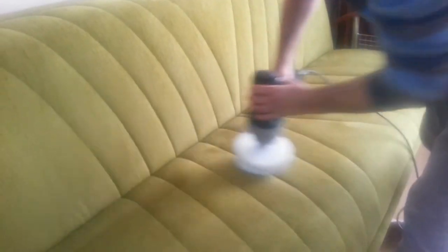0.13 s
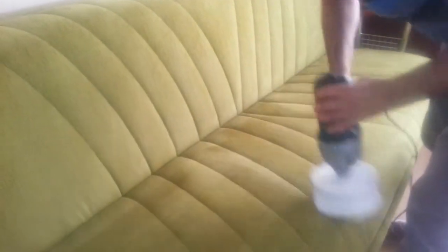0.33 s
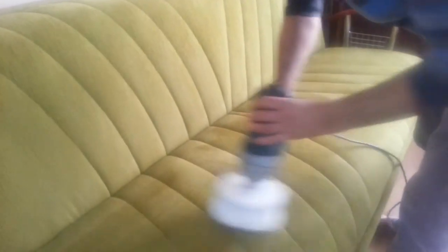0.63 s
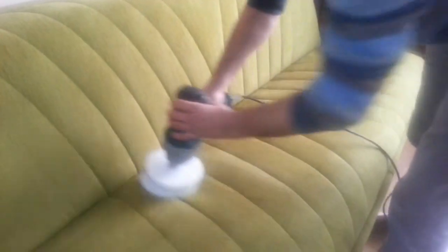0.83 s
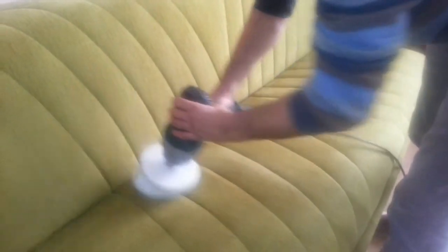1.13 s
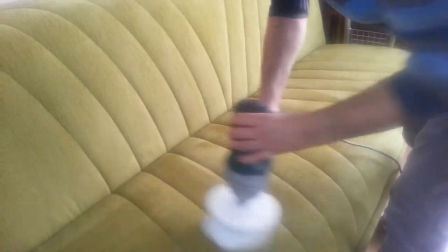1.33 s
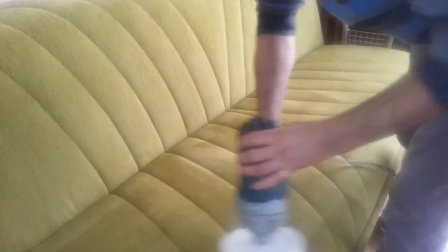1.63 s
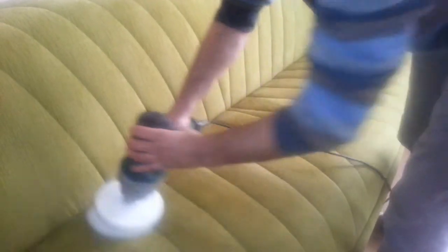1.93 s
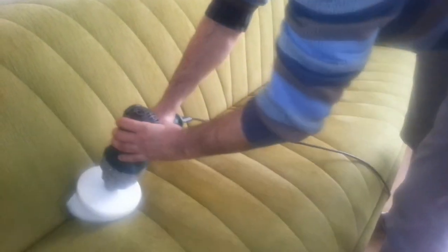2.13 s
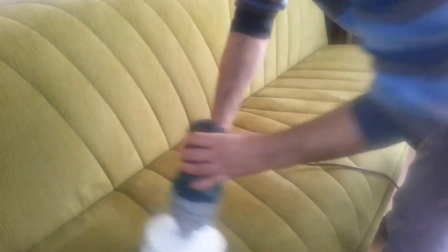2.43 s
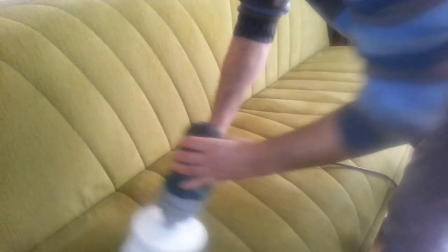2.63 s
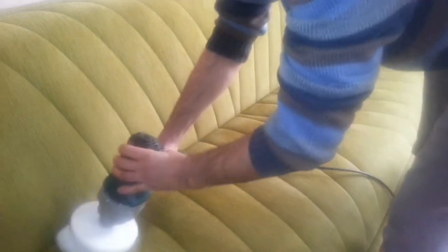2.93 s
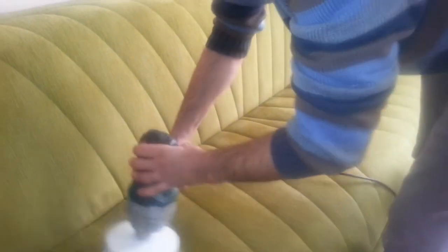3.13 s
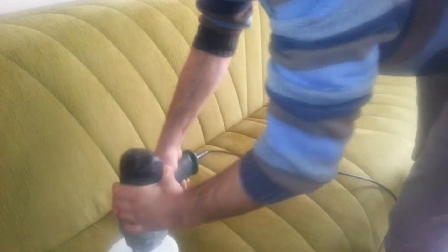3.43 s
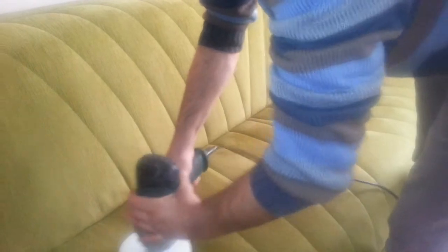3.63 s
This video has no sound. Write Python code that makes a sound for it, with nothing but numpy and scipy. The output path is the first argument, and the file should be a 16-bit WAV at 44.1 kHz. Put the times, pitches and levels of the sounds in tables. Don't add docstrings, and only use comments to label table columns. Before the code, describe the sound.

A handheld rotary brush runs continuously on a fabric sofa indoors, its shrill whine flickering between left and right over roaring, hissing noise; soft low thuds follow, and the pitch sags late. Close stereo microphone.

```python
import sys
import numpy as np
from scipy import signal
from scipy.io import wavfile
from scipy.ndimage import uniform_filter1d

SR = 44100
rng = np.random.default_rng(int(sys.argv[2]) if len(sys.argv) > 2 else 0)


def nominal_scale(level):
    x = np.asarray(level, float) / 20
    return 10 ** x


def digitize_waveform(pressure):
    field = np.atleast_2d(pressure).T
    bounded = np.clip(field, -1, 1)
    quanta = np.round(bounded * 32767).astype(np.int16)
    wavfile.write(sys.argv[1], SR, quanta)


N = 166257


def rms_one(x):
    return x / np.sqrt(np.mean(x ** 2) + 1e-20)


def in_time(rows):
    s, *columns = np.transpose(rows)
    now_s = np.arange(N) / SR
    return np.array([np.interp(now_s, s, c) for c in columns])


def at_hz(rows, hz):
    f, *columns = np.transpose(rows)
    fall_db = 12 * np.log2(max(hz / f[-1], 1))
    return np.array([[np.interp(np.log(hz), np.log(f), c, right=c[-1] - fall_db)] for c in columns])


def drift(rate_hz):
    r = np.exp(-80 * np.pi * rate_hz / SR)
    white = rng.standard_normal(N // 40 + 3002)
    slow = signal.lfilter([1], [1, -2 * r, r * r], white)[3000:]
    return np.interp(np.arange(N) / 40, np.arange(len(slow)), rms_one(slow - slow.mean()))


# t/s, f/Hz (turns per second)
SHAFT_SPEED = [(0.0, 412.7), (0.125, 412.7), (0.274, 411), (0.454, 415.9), (0.63, 417.1), (0.773, 419.6),
               (0.85, 419), (0.923, 415.7), (1.122, 410.4), (1.257, 412.6), (1.482, 410.5), (1.611, 413.3),
               (1.771, 414.6), (1.851, 417), (1.951, 417), (2.17, 408.8), (2.23, 407.4), (2.609, 410.6),
               (2.739, 409.4), (2.824, 407.3), (3.043, 399), (3.243, 397.5), (3.467, 389.6), (3.77, 385)]


def shaft():
    wobble_hz = 0.35
    speed_hz = uniform_filter1d(in_time(SHAFT_SPEED)[0], size=2000)
    turns = np.cumsum(speed_hz + wobble_hz * drift(24.3)) / SR
    return speed_hz, turns


def order_tone(turns, order, flutter_db=3.0):
    lead = np.c_[[0, (order > 3) / 4]]
    sine = np.sin(2 * np.pi * (order * turns + rng.random() + lead))
    return nominal_scale(flutter_db * drift(12.0)) * np.sqrt(2) * sine


def order_family(turns, rows):
    return sum(nominal_scale(np.c_[[left_db, right_db]]) * order_tone(turns, order) for order, left_db, right_db in rows)


# t/s, left level/dB, right level/dB
WHINE_FADES = [(0.0, -31, -21), (0.04, -27, -24), (0.12, -26.0, -18.5), (0.2, -21, -23.5),
               (0.234, -21, -19.0), (0.374, -17, -21), (0.499, -16.5, -21), (0.584, -19.5, -19),
               (0.758, -11, -16), (0.808, -16, -17), (0.858, -20, -23), (0.953, -13, -17), (0.998, -19, -17),
               (1.073, -11.5, -23), (1.102, -14.0, -30), (1.177, -13, -13.5), (1.262, -16.5, -29),
               (1.302, -19.5, -12.5), (1.347, -13, -20), (1.407, -10, -17), (1.472, -13, -20.5),
               (1.502, -18.0, -24), (1.541, -16, -21), (1.591, -25, -22), (1.636, -24.5, -30.5),
               (1.701, -31, -27), (1.751, -20.5, -19), (1.826, -14, -22), (1.876, -12, -18),
               (2.005, -15.5, -27.0), (2.065, -13, -28), (2.11, -21, -20), (2.205, -15, -23),
               (2.27, -26, -23), (2.305, -12.5, -29), (2.345, -14.0, -26), (2.385, -11.5, -39),
               (2.429, -12, -20), (2.539, -17, -14.5), (2.599, -17.0, -19), (2.744, -18.5, -19),
               (2.824, -12.5, -30.0), (2.913, -18.5, -25.0), (2.953, -17, -34.0), (3.028, -32, -22),
               (3.078, -19.5, -33), (3.163, -23.0, -29.5), (3.203, -14.5, -37), (3.258, -15.5, -23.0),
               (3.307, -25, -35), (3.377, -16, -25), (3.537, -13.5, -18), (3.602, -12.5, -29.0),
               (3.642, -18, -28), (3.687, -34, -22), (3.77, -25, -22.5)]


def motor_whine(turns):
    return nominal_scale(in_time(WHINE_FADES)) * order_tone(turns, 12, flutter_db=0)


# t/s, shaft hum level/dB, seven-blade fan level/dB, fan octave level/dB
HOUSING_GRIP = [(0, -34.5, -30, -52), (.25, -35, -25, -50), (.45, -47.5, -43, -44.5),
                (1.0, -38.5, -34.5, -36), (1.3, -47.5, -30, -45), (2.0, -42.5, -34, -28),
                (2.3, -44, -42, -41), (2.6, -54, -30.5, -33), (2.75, -40.5, -30, -48),
                (2.9, -36, -30.5, -40), (3.15, -38, -23.5, -39), (3.24, -36.5, -27.5, -14.5),
                (3.45, -36, -32, -18.5), (3.77, -33, -26.5, -34)]
# multiple of shaft speed, left level/dB, right level/dB
HUM_ORDERS = [(.89, -9.5, -10), (1, 2.5, -1.5), (2, -8, -12), (5.52, 1, -5)]


def fan_and_housing(turns):
    hum_db, fan_db, octave_db = in_time(HOUSING_GRIP)
    fan = nominal_scale(fan_db - 3.0) * order_tone(turns, 7)
    octave = nominal_scale(octave_db + np.c_[[-8.0, -14.0]]) * order_tone(turns, 14)
    return fan, octave + nominal_scale(hum_db) * order_family(turns, HUM_ORDERS)


# multiple of shaft speed, left level/dB, right level/dB
GEAR_ORDERS = [(35, -44, -45), (36, -48, -48)]


def loaded_gears(turns, speed_hz):
    loaded_hz, wake_db_per_hz = 395, 1.2
    load = nominal_scale(-wake_db_per_hz * np.maximum(speed_hz - loaded_hz, 0))
    return load * order_family(turns, GEAR_ORDERS)


# multiple of shaft speed, left level/dB, right level/dB
FAINT_ORDERS = [(2.76, -40.5, -40), (3, -45, -49), (8, -40, -44), (10, -49, -46), (11, -48, -48),
                (13, -47, -45), (21, -50, -47), (23, -47, -43), (24, -41, -34.5), (28, -58, -54)]


def motor():
    speed_hz, turns = shaft()
    fan, housing = fan_and_housing(turns)
    airborne = motor_whine(turns) + fan + order_family(turns, FAINT_ORDERS)
    return airborne, housing + loaded_gears(turns, speed_hz)


# t/s, speed/(m/s)
HAND_SPEED = [(0, 1.3), (.4, 1.5), (.55, 1.0), (.7, 1.9), (.9, 2.2), (1.02, 1.0), (1.25, 1.4), (1.5, .8),
              (1.78, 2.0), (1.95, 1.1), (2.2, 1.0), (2.35, 1.7), (2.55, .9), (2.85, 1.6), (3.1, 1.6),
              (3.4, .3), (3.62, .3), (3.68, 1.8), (3.77, 1.8)]


def moving_echoes(x, count):
    echo_db, near_s, far_s = -16.0, .004, .03
    seat_db, full_sweep_m_per_s = -5.0, 2.0
    strokes_per_s, sound_m_per_s = .9, 343
    out, now = x.copy(), np.arange(N)
    speed = in_time(HAND_SPEED)[0]
    seat = nominal_scale(seat_db) * np.minimum(speed / full_sweep_m_per_s, 1) ** 2

    def reflect(side, lag_s, path_m):
        return np.interp(np.abs(now - (lag_s + path_m / sound_m_per_s) * SR), now, x[side])

    for side in range(2):
        for lag_s in np.geomspace(near_s, far_s, count) * rng.uniform(.85, 1.15, count):
            stroke = np.tanh(4 * np.cos(2 * np.pi * (strokes_per_s * now / SR + rng.random())))
            path_m = np.cumsum(speed * rng.uniform(.7, 1.2) * stroke) / SR
            out[side] += nominal_scale(echo_db) * reflect(side, lag_s, path_m)
        path_m = np.cumsum(speed * (1 + .4 * drift(6.0))) / SR
        out[side] += seat * reflect(side, near_s, path_m)
    return out / np.sqrt(1 + seat ** 2 + count * nominal_scale(2 * echo_db))


# t/s, pressure level/dB, left-right level/dB, brightness level/dB
PAD_PRESSURE = [(0.0, -27, 3, 3), (0.03, -23.5, 6.0, 0.5), (0.11, -26, 5.5, 3.5), (0.16, -24, 6.5, 4.5),
                (0.31, -25.5, 5.5, 2), (0.57, -23.5, 7, 2.5), (1.09, -26.5, 4.5, -1), (1.67, -24.5, 7, 3),
                (1.85, -26, 5.5, -0.5), (2.21, -27, 3, -1), (2.67, -24.5, 7, -1), (2.86, -27.5, 5, 1.5),
                (3.1, -25.5, 3.5, -2), (3.15, -27.5, 4.5, 0.5), (3.58, -26.5, 4.5, -3),
                (3.73, -22, 5.0, -3.5), (3.74, -33, 7, 1.5), (3.77, -19.5, 0, -8)]
# f/Hz, left level/dB per Hz, right level/dB per Hz
PAD_COLOUR = [(106, -43, -24), (170, -19, -15.5), (354, -7.5, -5.5), (482, -11.5, -7.5), (1210, 0, 1.5),
              (2080, 0, -3.5), (2716, 3.5, 3), (3330, -3.5, -5), (4020, -6, -2.5)]


def pad_roar(hz):
    pressure_db, pan_db, bright_db = in_time(PAD_PRESSURE)
    level_db = pressure_db - 29 + np.c_[[.5, -.5]] * pan_db
    bright = np.interp(hz, [1900, 2600], [0, 1]) * (bright_db - bright_db.mean())
    return nominal_scale(2 * (level_db + bright + at_hz(PAD_COLOUR, hz))), bright


# t/s, level/dB, left-right level/dB
VENT_AIR = [(0.0, -19, -1), (0.02, -19, -4), (0.17, -19, -4.0), (0.22, -20.5, -4.5), (1.06, -21, -2.5),
            (1.77, -20.5, -2.5), (1.83, -21.5, 2), (1.86, -21.5, -2), (2.0, -18.5, -2), (2.07, -19, -1),
            (2.51, -20, -2), (2.55, -20, 0), (2.82, -20.5, -1), (2.91, -18.5, -2), (3.38, -21, 0),
            (3.66, -21, -1.5), (3.73, -18.5, -1), (3.77, -22.5, -1.5)]
# f/Hz, left level/dB per Hz, right level/dB per Hz
AIR_COLOUR = [(3480, -8, -8), (4460, -3, -8.5), (5470, 6.5, -4), (6870, 1.5, 2.5), (7470, -2.5, 0),
              (8300, -4.5, -5), (9360, -8, -8), (11000, -9, -10.5), (12600, -9.5, -13), (15000, -15, -16)]


def air_hiss(hz, bright):
    air_db, pan_db = in_time(VENT_AIR)
    level_db = air_db - 33.0 + np.c_[[.5, -.5]] * (pan_db - 2.5)
    return (hz > 3000) * nominal_scale(2 * (level_db + (hz < 4700) * bright + at_hz(AIR_COLOUR, hz)))


# f/Hz, likeness (0-1)
SIDE_LIKENESS = [(150, 1), (400, 0.91), (1200, 0.47), (2500, 0.64), (5000, 0), (9000, 0), (14000, 0.03)]


def rush(throb_db, patch_db, flicker_db):
    left_lag = 5
    edges = 100 * 2 ** np.r_[0:3:1 / 2, 3:5:1 / 3, 5:7.5:1 / 5]
    throb = drift(7.0)
    patches = [drift(5.0) for _ in range(9)]
    white = rng.standard_normal((2, 3, N))
    out = 0
    for k, (low, high) in enumerate(zip(edges, edges[1:])):
        band = signal.butter(2, [low, high], "band", fs=SR, output="sos")
        both, left, right = signal.sosfilt(band, white[k % 2])
        hz = np.sqrt(low * high)
        first, blend = k // 3, k / 3 % 1
        patch = (1 - blend) * patches[first] + blend * patches[first + 1]
        motion_db = throb_db * throb + patch_db * patch + flicker_db * drift(16.5)
        roar, bright = pad_roar(hz)
        gain = np.sqrt((roar + air_hiss(hz, bright)) * SR / 2) * nominal_scale(motion_db)
        alike = np.clip(at_hz(SIDE_LIKENESS, hz), 0, 1)
        shared = np.array([np.roll(both, left_lag), both])
        out = out + gain * (np.sqrt(alike) * shared + np.sqrt(1 - alike) * np.array([left, right]))
    return out


# t/s, peak level/dB, f/Hz
LOW_SWELLS = [(1.06, -40.5, 172), (1.2, -42, 133), (1.38, -46.5, 173.3), (1.7, -39.5, 175),
              (2.18, -36, 180.3), (2.7, -44.5, 171.4), (2.939, -43.5, 185), (3.13, -40.5, 178),
              (3.24, -39.5, 174.7), (3.33, -37, 155.8), (3.4, -37.5, 170), (3.52, -39, 190),
              (3.58, -42, 182.6), (3.67, -37, 165.5)]


def low_swells():
    t, width_s = np.arange(N) / SR, 0.016
    out = 0
    for s, db, hz in LOW_SWELLS:
        swell = np.exp(-.5 * ((t - s) / width_s) ** 2)
        out = out + nominal_scale(db) * swell * np.sin(2 * np.pi * hz * t)
    return out * nominal_scale(np.c_[[1.5, -1.5]])


def scene():
    airborne, housing = motor()
    tones = moving_echoes(airborne, count=4) + housing
    return tones + rush(throb_db=0.5, patch_db=1.03, flicker_db=1.2) + low_swells()


# f/Hz, left level/dB, right level/dB
GATE_THRESHOLD = [(150, 8, 8), (250, 3.5, 3.5), (330, -2, -3), (520, -2, -2), (800, -12, -12),
                  (2500, -12, -12), (3200, -5.5, -7), (4000, -8, -9), (4600, -14, -15), (8000, -14, -18),
                  (10000, -2, -6), (12000, 3.5, 3), (14400, 5.5, 5.5)]


def gate_weak_lines(x):
    x = np.pad(x, ((0, 0), (0, 2048)), "reflect", reflect_type="odd")
    hz, _, lines = signal.stft(x, SR, window="cosine", nperseg=2048, boundary="even", padded=False)
    power = np.abs(lines) ** 2
    middle = power[:, (hz > 700) & (hz < 3500)].sum(axis=1)
    busy = uniform_filter1d(middle, size=9, axis=1)
    busy = (busy / busy.mean(axis=1, keepdims=True))[:, None] ** np.array([.8, .3])[:, None, None]
    over_db = np.array([at_hz(GATE_THRESHOLD, f) for f in np.clip(hz, 20, GATE_THRESHOLD[-1][0])])
    over_db = over_db.transpose(1, 0, 2)
    usual = uniform_filter1d(np.median(power, axis=2, keepdims=True), size=5, axis=1)
    capped = np.minimum(power, 20 * np.median(power, axis=1, keepdims=True))
    nearby = uniform_filter1d(uniform_filter1d(capped, size=61, axis=1), size=5, axis=2)
    usual = np.where((hz > 1000)[:, None], np.log(2) * nearby, usual)
    left_over = nominal_scale(-22.0) * (hz < 1000)[:, None]
    kept = np.where(power > usual * nominal_scale(2 * over_db) * busy, 1, left_over)
    return signal.istft(lines * kept, SR, window="cosine", nperseg=2048)[1][:, :N]


def low_pass(x):
    return signal.sosfilt(signal.butter(12, 14560, fs=SR, output="sos"), x)


def record(dry):
    bass_cut = signal.butter(2, 120, "high", fs=SR, output="sos")
    mix = gate_weak_lines(signal.sosfilt(bass_cut, np.tanh(dry)))
    return low_pass(mix)


dry = scene()
out = record(dry)
digitize_waveform(out)
```